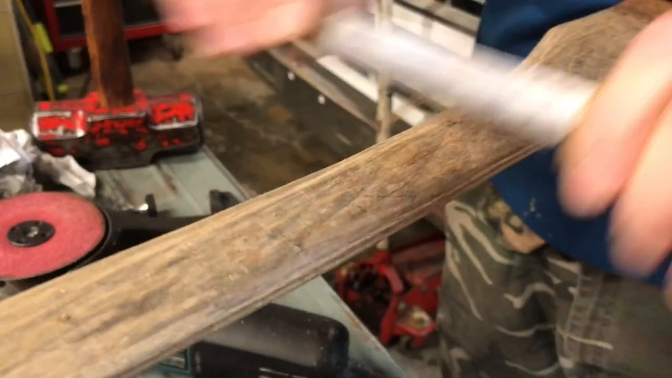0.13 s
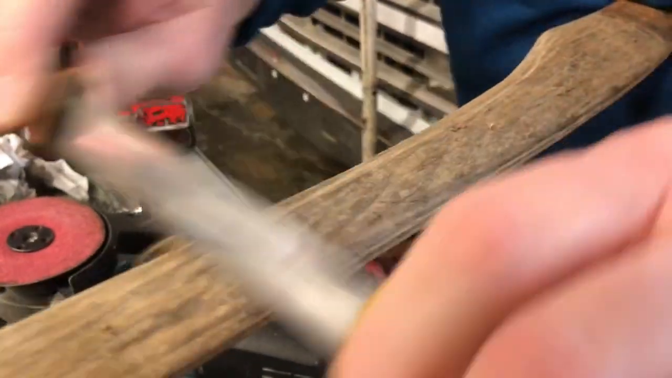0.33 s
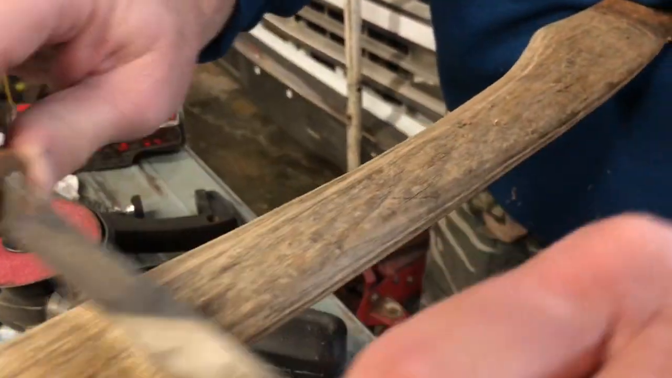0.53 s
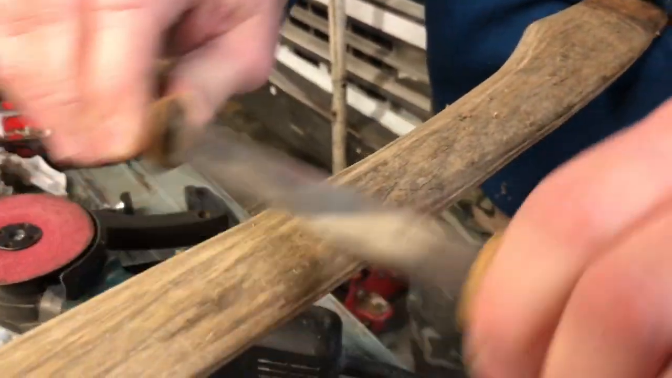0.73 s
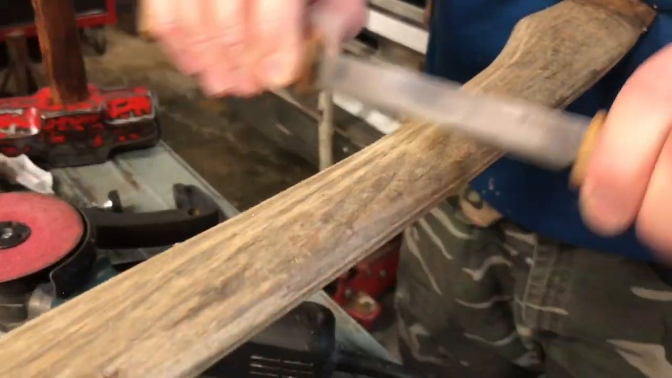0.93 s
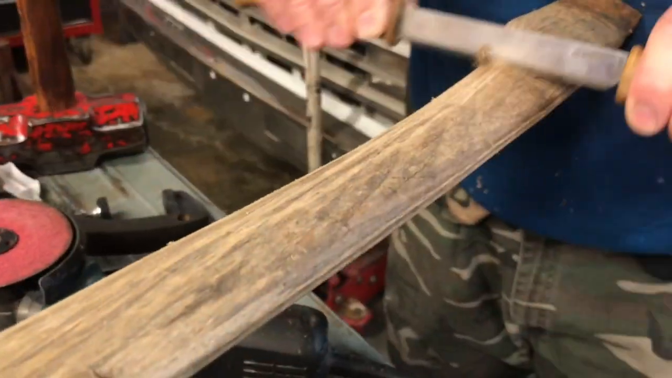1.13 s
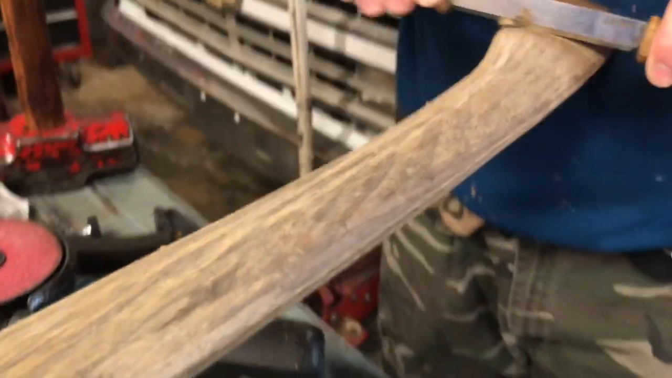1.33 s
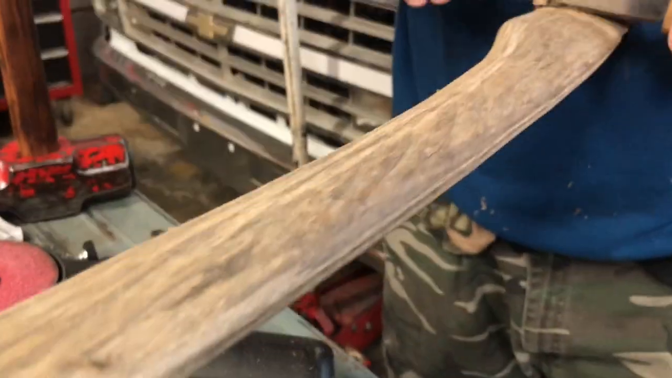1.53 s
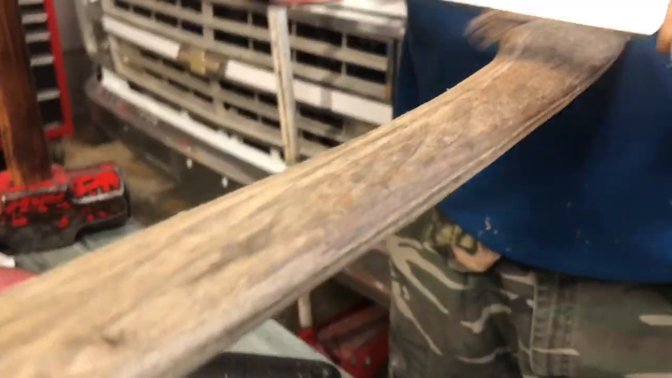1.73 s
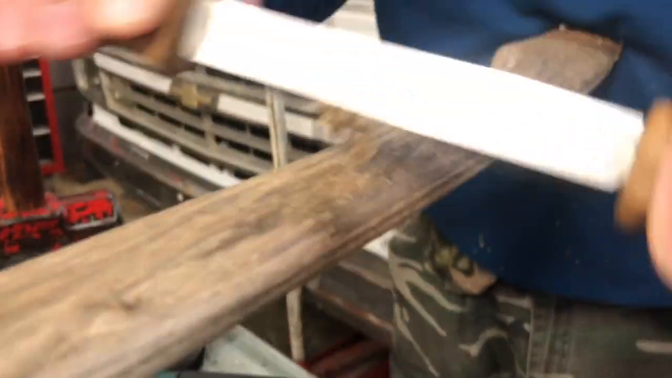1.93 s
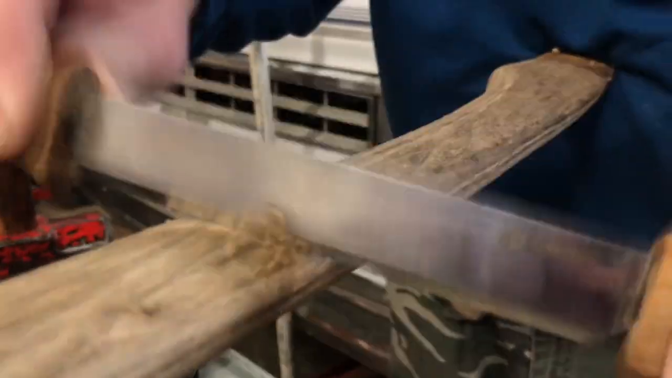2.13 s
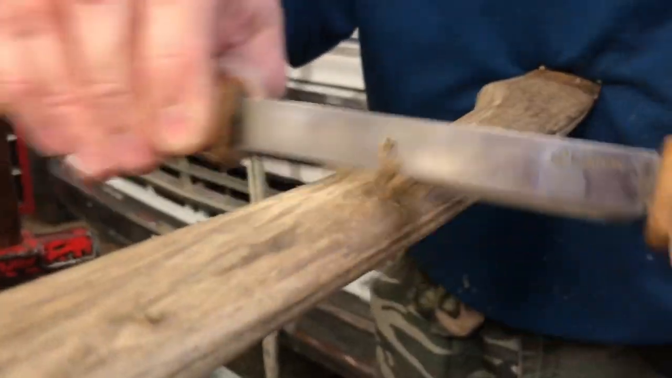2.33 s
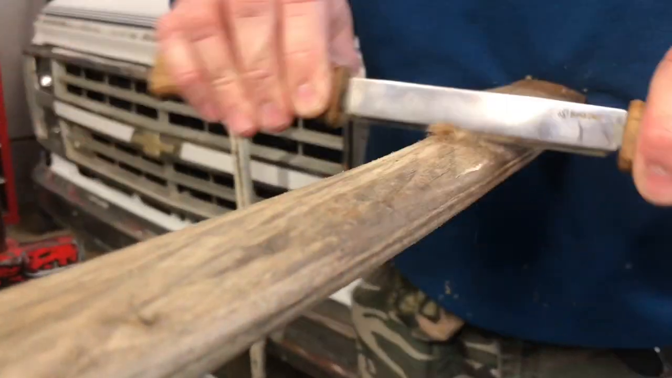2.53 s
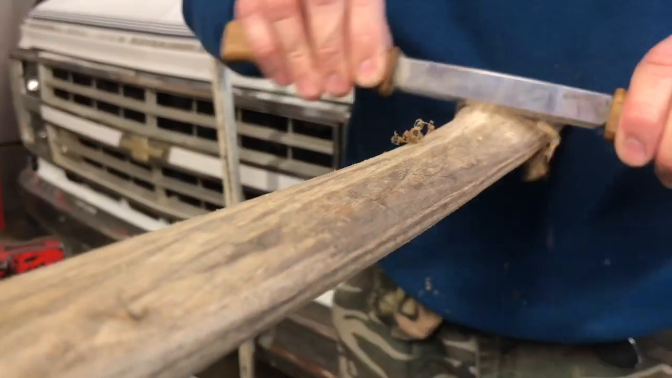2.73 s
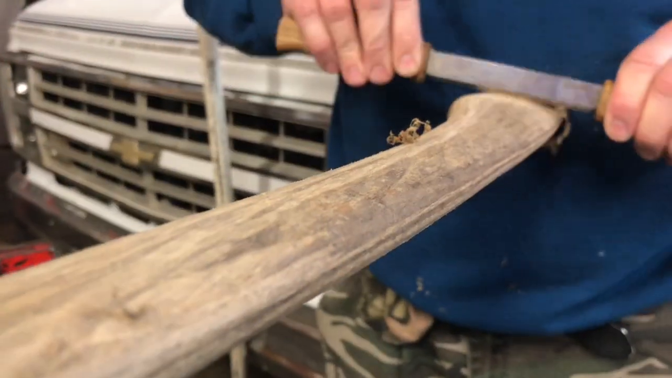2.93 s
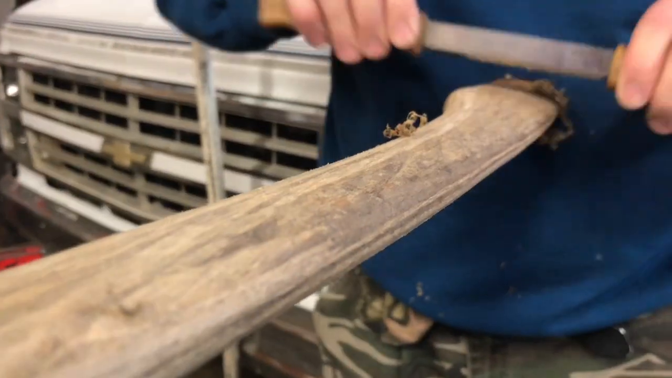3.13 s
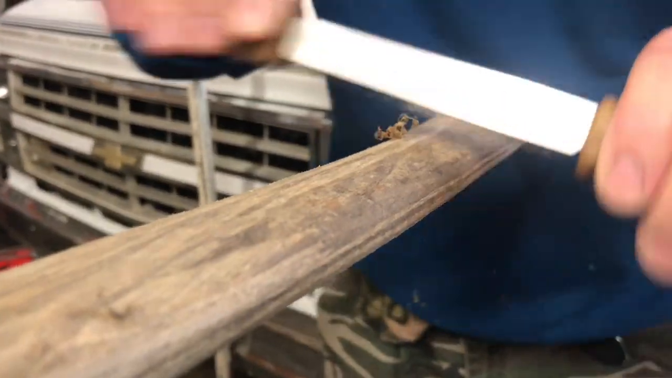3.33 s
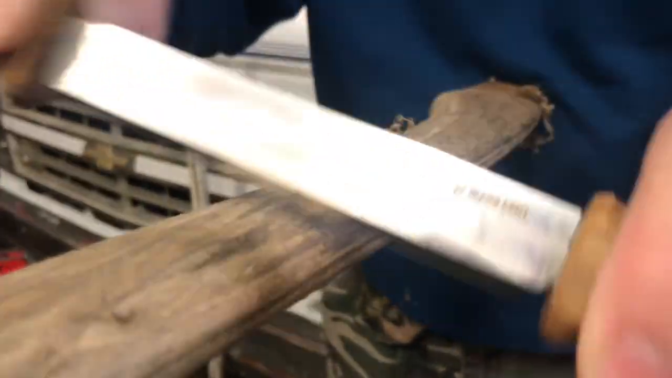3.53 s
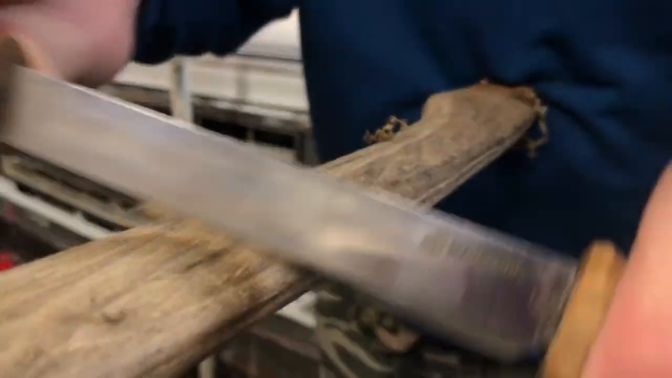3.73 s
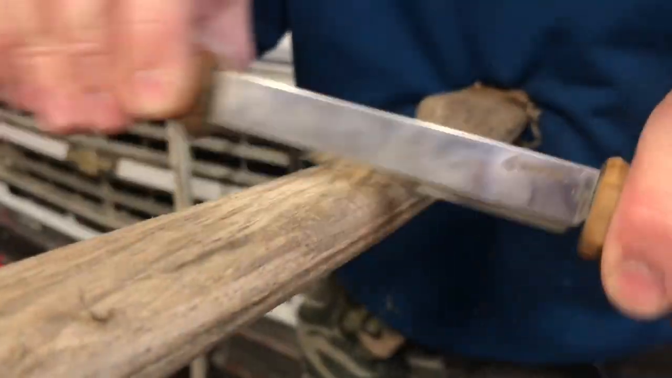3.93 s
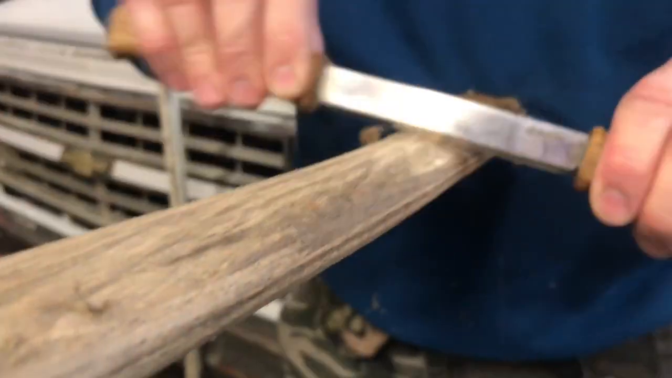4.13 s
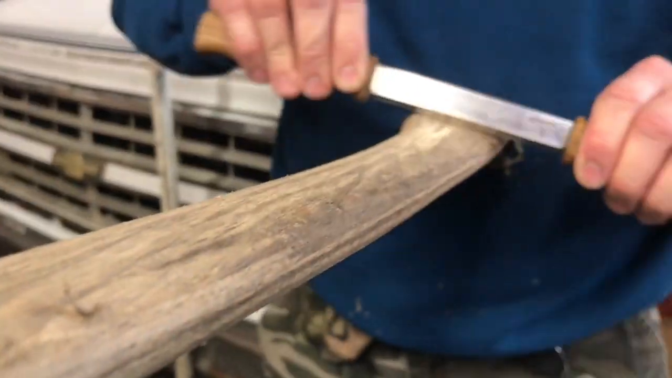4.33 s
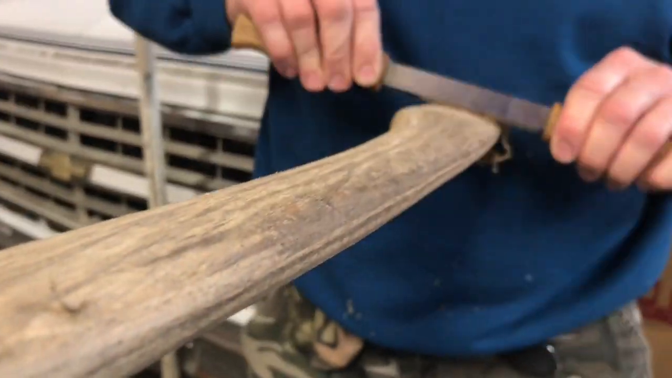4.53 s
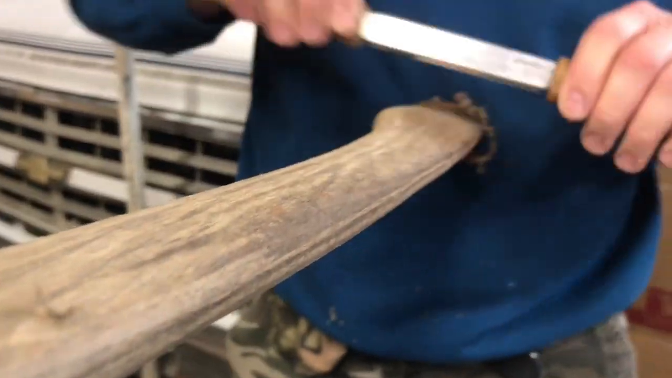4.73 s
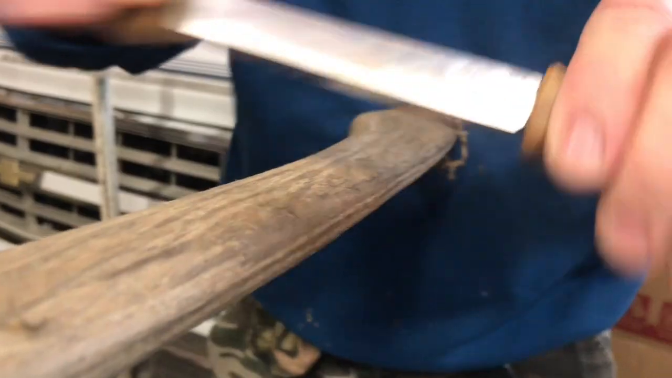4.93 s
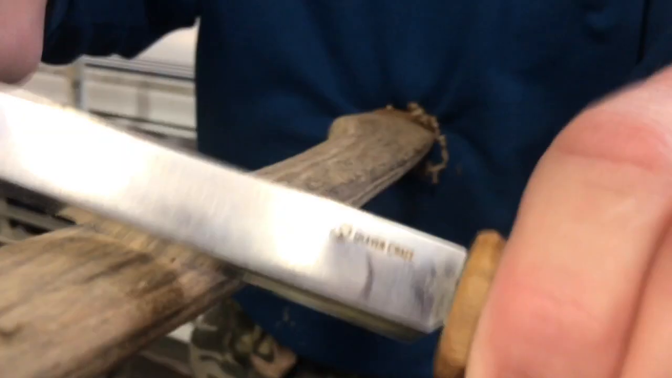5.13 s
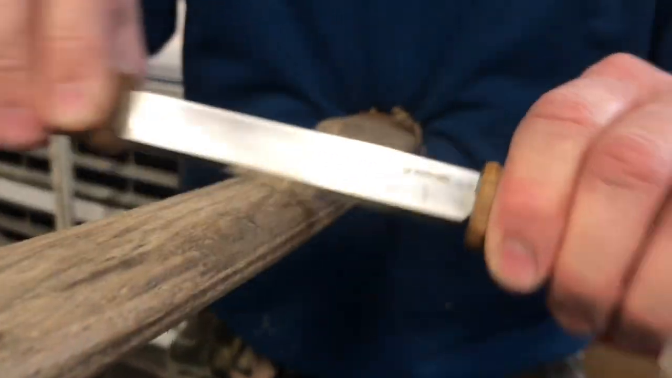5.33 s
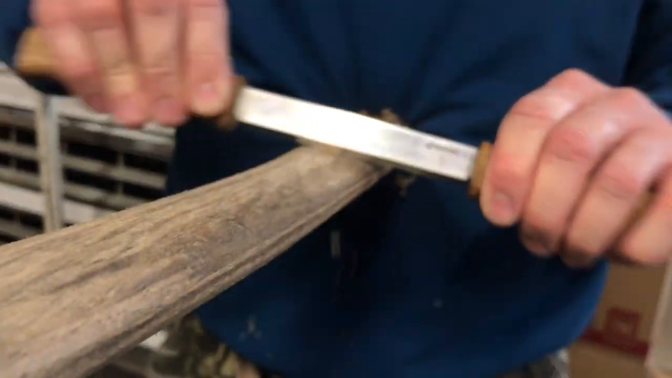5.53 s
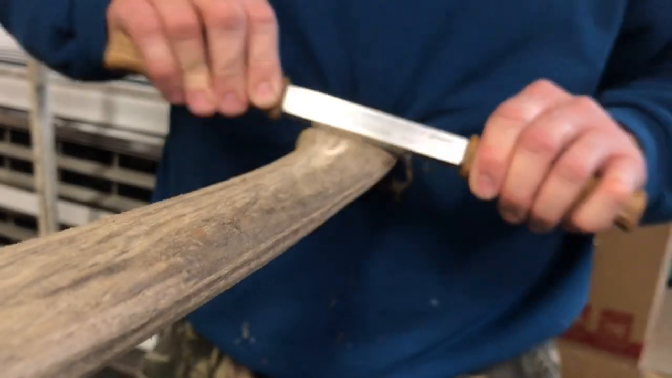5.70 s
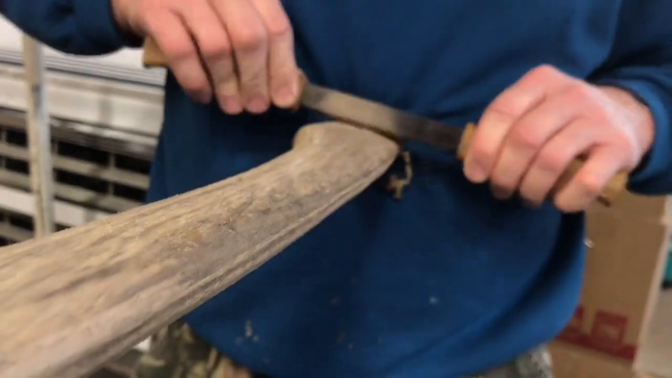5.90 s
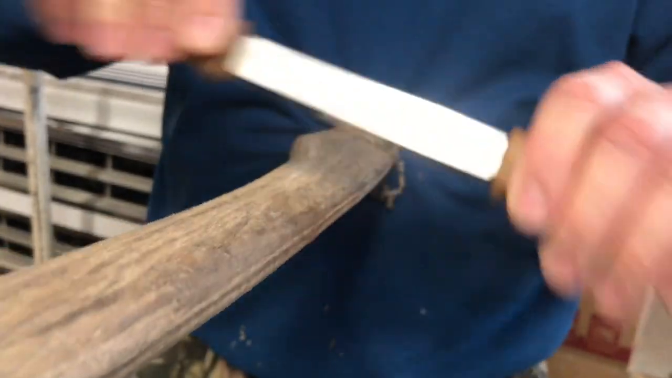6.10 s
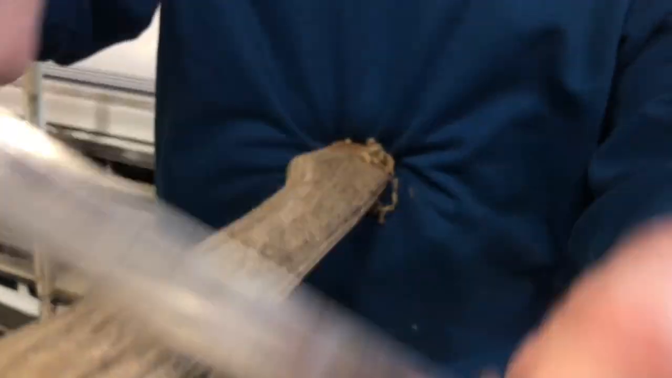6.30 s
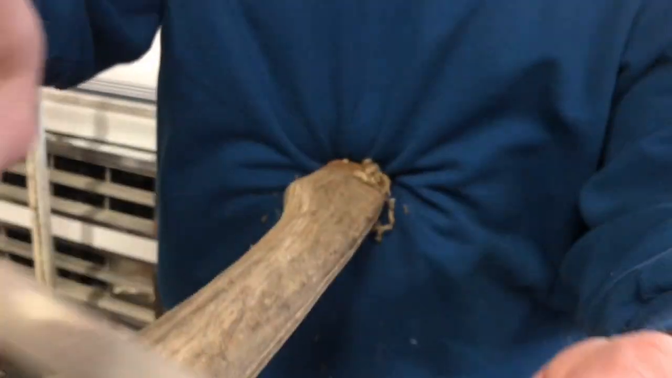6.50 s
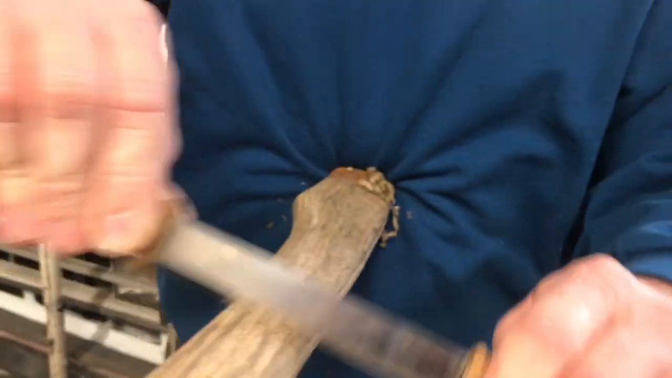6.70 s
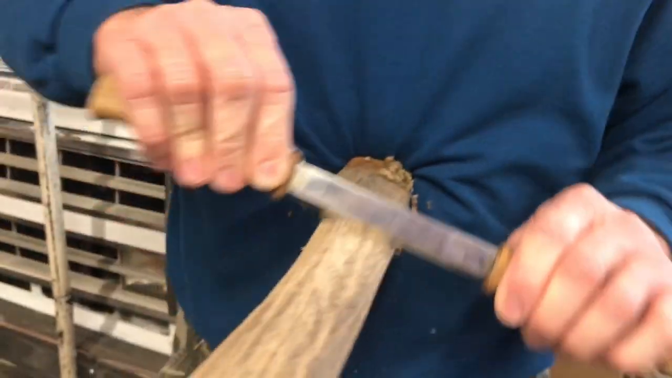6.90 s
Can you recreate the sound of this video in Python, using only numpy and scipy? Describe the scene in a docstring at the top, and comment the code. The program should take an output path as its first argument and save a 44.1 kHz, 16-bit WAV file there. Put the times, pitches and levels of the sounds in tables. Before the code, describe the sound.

In a workshop with a low, quiet hum, a drawknife knocks onto dry wood and scrapes along it for just under a second. This happens five times at a steady pace, with short pauses holding faint ticks and light skims of the blade. Most strokes fade into a small judder, and the last has a sharp splinter snap near its start. The sound is close, with little room echo.

```python
"""A two-handled steel blade pulled along an old wooden handle: five strokes, close to one microphone.
Each stroke lands with a knock, then tears fibres: a dense crackle that rings the wood and the blade.
The first four run off the handle's end with a judder. Between strokes the blade ticks and skims over
the wood, and splinters snap. Behind it all is the workshop: a short room tail and a quiet machine hum."""
import sys
import numpy as np
from scipy import signal
from scipy.fft import rfft, irfft
from scipy.io import wavfile
from scipy.ndimage import uniform_filter1d

SR = 44100
rng = np.random.default_rng(int(sys.argv[2]) if len(sys.argv) > 2 else 0)


def store_pcm(level_fs):
    """Save levels as 16-bit WAV."""
    pcm = np.round(np.clip(level_fs, -1, 1) * 32767).astype(np.int16)
    wavfile.write(sys.argv[1], SR, np.atleast_2d(pcm).T)


N = 306936

# colour of the workshop's room tone: freq_hz, density_db
ROOM_TONE = [(12, -56.5), (27, -31), (44, 2), (130, -2), (200, -6.5), (330, -17), (560, -26), (800, -30.5),
             (1150, -26), (1500, -33.5), (2100, -38.5), (3900, -43), (7000, -50), (16000, -54)]
# drift of the air noise above the rumble: time_s, gain_db
AIR_DRIFT = [(0, 10.5), (.5, 8.5), (1.9, 8), (3.4, 11.5), (3.7, 5.5), (4.95, 6), (6.1, 10), (6.96, -7)]
# a machine in the background: pitch_hz, level_db
MACHINE_HUM = [(64.6, -61.5), (119.5, -55), (457, -82), (1061, -78), (1152, -87), (1453, -77)]
# light touches of the blade and snapping splinters: start_s, level_db, body_db, bright_hz
TICKS = [(0.271, -47, -14, 5000), (.3018, -44.5, -12, 3620), (.3796, -41, -8, 7840),
         (1.9815, -45.5, -14, 7000), (3.263, -33.5, -21, 4970), (4.591, -23, -1, 12000),
         (4.985, -47.5, 6, 1770), (6.123, -43.5, 8, 1500), (6.1726, -27.5, -17, 12330),
         (6.1808, -33, -18, 4000), (6.353, -27.5, 0, 4000), (6.386, -45, -13, 8000),
         (6.5879, -13.5, -15, 2170)]
# colour of a light touch on the wood: freq_hz, density_db
TOUCH_COLOUR = [(200, 1), (900, -16), (1700, 3.5), (2400, -3.5), (3900, -2.5), (5200, -10.5), (7000, -8),
                (10500, -12.5), (12500, -12.5), (16000, -17)]
# decay of the room: freq_hz, t60_s
ROOM_DECAY = [(100, 0.86), (600, 0.73), (2000, 0.14), (4200, 0.54), (9000, 0.2), (16000, 0.06)]
# what the walls give back: freq_hz, gain_db
WALL_COLOUR = [(100, 6.5), (350, 2), (600, -0.5), (1500, 3.5), (4000, -5), (7000, -4), (16000, -8)]
# the blade lands: start_s, force_db, blade_db, hardness_db_per_octave, pitch_ratio
KNOCKS = [(0.5736, 0.5, -3.5, -1.5, 1.027), (2.1946, 1.5, 1.5, 5, 1.012), (3.7211, -1.5, 1, 0, 0.98),
          (5.1883, 0.5, 4, -4, 1.0), (6.4571, -3, -0.5, 0, 0.97)]
# modes of the struck wood: pitch_hz, level_db, t60_s
WOOD_MODES = [(162, -28, 0.073), (264, -30, 0.091), (544, -18.5, 0.048), (700, -8.5, 0.0095),
              (909, -12.5, 0.027), (1137, -16, 0.032), (1345, -2.5, 0.011), (1512, -3, 0.0095),
              (2360, -18, 0.01)]
# modes of the struck blade: pitch_hz, level_db, t60_s
BLADE_MODES = [(3120, -17, 0.011), (3890, -9.5, 0.0098), (4400, -9.5, 0.0037), (6960, -23.5, 0.0063),
               (8520, -30.5, 0.0096), (10900, -26, 0.0023), (12200, -30, 0.0023), (14930, -30, 0.0027)]
# what the bench throws back: freq_hz, gain_db
BENCH_COLOUR = [(100, 1), (500, -2.5), (1000, 7.5), (1500, -1), (2100, 8.5), (4000, -6.5), (16000, -3)]
# the pull after each landing: length_s, run_up_s, release_db_per_s, wood_db, blade_db, fizz_db,
# fade_db, ring_hz, ring_width_hz, upper_ring_ratio, shaving_end_hz, shaving_end_db
STROKES = [(0.95, 0.17, 385, -34, -22.5, -31.5, -10, 3790, 840, 0.53, 2500, 5),
           (.822, 0.097, 328, -33.5, -24, -31.5, -5.5, 4140, 900, 0.87, 2700, 5.5),
           (.879, 0.14, 374, -34.5, -22, -30, -10, 4100, 970, 0.69, 2680, 6),
           (.7, 0.042, 494, -35.5, -24.5, -31.5, -7.5, 4020, 880, 0.65, 1800, 10.5),
           (.8, 0.2, 380, -31, -22, -29.5, -7.5, 4080, 700, 0.56, 2300, 8)]
# bare colour of tearing fibres: freq_hz, density_db
TEAR_COLOUR = [(60, -36.5), (270, -13), (370, -16.5), (490, -18), (700, -13.5), (1300, -12), (1900, -13),
               (3200, -11), (4550, -12), (5300, -15.5), (8000, -14.5), (10500, -20), (14000, -25),
               (16000, -25)]
# resonances of the scraped wood along the handle: pitch_hz, width_hz, start_lift_db, end_lift_db
WOOD_RESONANCES = [(610, 45, 3.5, 15.5), (812, 66, 9, -2), (917, 64, 12, 7), (1136, 100, 2.5, 13),
                   (1370, 120, 1.5, 8), (1566, 110, 5.5, 3.5), (2118, 89, 3.5, 12.5), (2705, 670, 4, 8.5)]
# the blade's gliding upper rings: start_hz, end_hz, width_hz, lift_db, nearest_lift_db
BLADE_RESONANCES = [(5600, 6200, 310, 9.5, -2), (6440, 6750, 650, 10.5, 0.5), (8700, 9320, 1300, 4, 5),
                    (12050, 12400, 1800, 4, 10), (14200, 17000, 2400, -4.5, 8)]
# the edge catches the grain and one ring stands out: centre_s, half_length_s, pitch_hz, width_hz, lift_db
CATCHES = [(0.825, 0.33, 3240, 800, 6), (.87, 0.19, 2150, 200, 8), (1.285, 0.043, 640, 110, 19),
           (1.45, 0.053, 2190, 450, 9.5), (2.366, 0.14, 1650, 364, 4), (2.397, 0.11, 9250, 900, 9),
           (2.91, 0.19, 1120, 450, 6.5), (5.29, 0.066, 1770, 160, 17), (5.832, 0.031, 1700, 170, 15),
           (6.72, 0.13, 864, 230, 10.5), (6.76, 0.097, 7730, 1500, 12.5), (6.813, .07, 11200, 1300, 8),
           (6.935, 0.12, 1610, 151, 14.5)]
# the edge digs deeper (+) or rides over smooth grain (-): centre_s, half_length_s, gain_db
BITES = [(0.7, 0.013, 2), (0.805, 0.1, 2), (1.16, 0.045, -2), (1.432, 0.075, 3.5), (2.5, 0.06, 4),
         (2.63, 0.14, -3), (2.818, 0.06, 2.5), (3.91, .015, 3), (4.323, 0.063, 2.5), (5.35, 0.016, 1),
         (5.872, 0.017, 2), (6.591, 0.016, 2), (6.678, 0.058, 4)]
# how wood, blade and fizz follow a stroke: speed_power, fade_ratio, end_db, bite_ratio, release_ratio
BAND_RESPONSE = [(.6, .15, 2.5, 0.42, 0.77), (1.05, 1, -1, 1, 1.09), (1.05, 0.84, -2, 0.88, 1.1)]
# the edge runs off the handle's end: centre_s, level_db, half_length_s
RUN_OFFS = [(1.521, -32, 0.034), (3.038, -37, 0.049), (4.602, -37, 0.048), (5.9, -33, 0.022)]
# low modes shaken by that judder: pitch_hz, width_hz, level_db
JUDDER_MODES = [(277, 160, 0.5), (442, 18, -1), (625, 86, 12), (890, 140, -3), (1084, 30, 14)]
# the blade skims back: start_s, length_s, level_db, swell_db_per_s, brightness_db_per_octave
SKIMS = [(1.79, .16, -68, 6, 1.5), (3.1, .14, -50.5, -11, -1), (6.163, 0.208, -54, 18, 0.6)]


def amp(db):
    """Decibels to gain."""
    return 10 ** (np.asarray(db) / 20)


def unit(x):
    """Scales to rms 1."""
    return x / np.sqrt(np.mean(x ** 2) + 1e-20)


def read(points, hz):
    """Reads a table on a log-frequency axis."""
    f, value = np.transpose(points)
    return np.interp(np.log(hz + 1), np.log(f + 1), value)


def add(mix, start_s, sound):
    """Mixes a sound in at start_s."""
    part = mix[max(round(start_s * SR), 0):][:len(sound)]
    part += sound[:len(part)]


def colour(x, points):
    """Filters by a table of freq_hz, gain_db."""
    return irfft(rfft(x) * amp(read(points, np.fft.rfftfreq(len(x), 1 / SR))), len(x))


def wander(size, hz):
    """Random motion of rms 1, mostly slower than hz."""
    f = np.fft.rfftfreq(size, 1 / SR)
    return unit(irfft(rfft(rng.standard_normal(size)) * (f > 0) / (1 + (f / hz) ** 2), size))


def hump(hz, centre_hz, width_hz):
    """The shape of a resonance, 1 at its centre."""
    return 1 / (1 + (2 * (hz - centre_hz) / width_hz) ** 2)


def bell(hz, centre_hz, width_hz):
    """A steep-sided peak, 1 at its centre and one half at the edges of its width."""
    return .5 ** ((2 * (hz - centre_hz) / width_hz) ** 2)


def swell(t, centre_s, half_length_s):
    """A smooth rise and fall in time, 1 at centre_s."""
    return np.exp(-((t - centre_s) / half_length_s) ** 2)


def room_tone(noise_db=-49, rumble_hz=500, waver_hz=4):
    """The workshop behind the bench: low rumble, drifting air noise and a machine's wavering hum."""
    noise = amp(noise_db) * unit(colour(rng.standard_normal(N), ROOM_TONE))
    rumble = signal.sosfiltfilt(signal.butter(2, rumble_hz, fs=SR, output="sos"), noise)
    air = (noise - rumble) * amp(np.interp(np.arange(N) / SR, *np.transpose(AIR_DRIFT)))
    hum = np.zeros(N)
    for hz, db in MACHINE_HUM:
        pitch_hz = hz + waver_hz * wander(N, hz=5.05)
        hum += amp(db) * unit(np.sin(2 * np.pi * np.cumsum(pitch_hz) / SR))
    return rumble + air + hum


def ring(modes, pitch_ratio):
    """Dying modes; neighbours start in opposite directions, so the blow takes a moment to build."""
    t = np.arange(SR // 8) / SR
    return sum((-1) ** k * amp(db - 60 * t / t60_s) * np.sin(2 * np.pi * hz * pitch_ratio * t)
               for k, (hz, db, t60_s) in enumerate(modes))


def tick(start_s, level_db, body_db, bright_hz, t60_s=0.01):
    """A light touch or a snapping splinter: a brief crack with some of the wood's ring."""
    t = np.arange(SR // 8) / SR
    tone = [(hz, db + 10 * hump(hz, bright_hz, .5 * bright_hz)) for hz, db in TOUCH_COLOUR]
    crack = unit(colour(rng.standard_normal(len(t)), tone)) * amp(-60 * t / t60_s)
    body = amp(body_db) * ring(WOOD_MODES, pitch_ratio=0.87)
    return start_s, amp(level_db) * (crack + body)


def room_tail(direct, gap_s=.008):
    """The walls return a diffuse tail to the microphone, each band dying at its own speed."""
    taps = rng.standard_normal(SR // 2) * (np.arange(SR // 2) > gap_s * SR)
    hz, t, spectrum = signal.stft(taps, SR, nperseg=256)
    decay = amp(-60 * t / read(ROOM_DECAY, hz)[:, None])
    tail = signal.istft(spectrum * decay, SR, nperseg=256)[1]
    return colour(signal.fftconvolve(direct, tail / np.linalg.norm(tail))[:N], WALL_COLOUR)


def knock(start_s, force_db, blade_db, hardness, pitch_ratio, scatter_db=-14, scatter_t60_s=0.06):
    """The edge hits the wood and both ring; the bench and things nearby scatter the blow."""
    blow = ring(WOOD_MODES, pitch_ratio)
    steel = [(hz, db + blade_db + hardness * np.log2(hz / 4000), t60_s) for hz, db, t60_s in BLADE_MODES]
    add(blow, start_s=.0005, sound=ring(steel, pitch_ratio))
    t = np.arange(len(blow)) / SR
    scatter = rng.standard_normal(len(t)) * amp(-60 * t / scatter_t60_s) * (t > .003)
    bench = colour(scatter / np.linalg.norm(scatter), BENCH_COLOUR)
    echoes = signal.fftconvolve(blow, bench)[:len(t)]
    return start_s, amp(force_db) * (blow + amp(scatter_db) * echoes)


def fibres(size, per_s, spread_db):
    """A train of tiny fractures, many small and a few large."""
    strengths = amp(spread_db * np.minimum(rng.exponential(1, size), 4))
    return unit(strengths * rng.standard_normal(size) * (rng.random(size) < per_s / SR))


def resonances(hz, age_s, ring_hz, ring_width_hz, upper_ring_ratio,
               ring_db=13.5, ring_fade_db=-3, sag_hz=160, ripple_db=1.2):
    """Colour in dB of the scraped wood and the blade, shifting as the edge travels."""
    travel = np.clip(age_s / 0.84, 0, 1)  # share of the handle covered
    glide = np.clip(age_s / 0.29, 0, 1)  # the blade's rings settle as the stroke gets under way
    nearness = swell(age_s, centre_s=0.13, half_length_s=.27)  # the blade passes the microphone
    shape_db = read(TEAR_COLOUR, hz)
    for pitch_hz, width_hz, start_db, end_db in WOOD_RESONANCES:
        shape_db = shape_db + (start_db + (end_db - start_db) * travel) * hump(hz, pitch_hz, width_hz)
    for start_hz, end_hz, width_hz, lift_db, nearest_db in BLADE_RESONANCES:
        peak = bell(hz, start_hz + (end_hz - start_hz) * glide, width_hz)
        shape_db += (upper_ring_ratio * lift_db + nearest_db * nearness) * peak
    main_ring = bell(hz, ring_hz + sag_hz * (1 - glide), ring_width_hz)
    shape_db += (ring_db + ring_fade_db * travel) * main_ring
    # a near reflection lags more as the blade moves away: ripples slide down the spectrum
    lag_s = np.interp(travel, [0, 1], [.0014, .0026])
    return shape_db + ripple_db * np.cos(2 * np.pi * hz * lag_s)


def shaving(hz, age_s, length_s, end_hz, end_db, start_hz=3010, plunge_s=0.015):
    """Lift in dB of the shaving: it rings lower and louder as it grows, and plunges as it tears free."""
    grown = np.clip(age_s / length_s, 0, 1) ** 0.87
    freed = np.exp(np.minimum((age_s - length_s) / plunge_s, 1))
    held_hz = start_hz + (end_hz - start_hz) * grown
    return end_db * grown ** 2 * bell(hz, held_hz * np.exp(-0.76 * freed), width_hz=0.2 * held_hz)


def catches(hz, time_s):
    """Lift in dB of the rings that stand out where the edge catches."""
    return sum(lift_db * swell(time_s, centre_s, half_s) * bell(hz, pitch_hz, width_hz)
               for centre_s, half_s, pitch_hz, width_hz, lift_db in CATCHES)


def grain(shape, bins):
    """Uneven grain favours now one resonance, now another: a smooth random field of rms 1."""
    across_pitch = uniform_filter1d(rng.standard_normal(shape), size=bins, axis=0)
    return unit(uniform_filter1d(across_pitch, size=12, axis=1))


def stroke(landing_s, length_s, run_up_s, release_db_per_s, wood_db, blade_db, fizz_db, fade_db,
           ring_hz, ring_width_hz, upper_ring_ratio, shaving_end_hz, shaving_end_db,
           bounce_s=.008, chatter_db=0.5, grip_db=0.6, fine_grain_db=2.08, broad_grain_db=2.0):
    """The edge bounces, sinks in and gathers speed, gripping and slipping; torn fibres ring the work."""
    t = np.arange(bounce_s, length_s + .2, 1 / SR)
    tearing = fibres(len(t), per_s=14000, spread_db=0.37) * amp(chatter_db * wander(len(t), hz=130))
    hz, frame_s, spectrum = signal.stft(tearing, SR, nperseg=2048, noverlap=1536)
    hz, age_s = hz[:, None], frame_s + bounce_s
    shape_db = resonances(hz, age_s, ring_hz, ring_width_hz, upper_ring_ratio)
    shape_db += shaving(hz, age_s, length_s, shaving_end_hz, shaving_end_db)
    shape_db += catches(hz, landing_s + age_s)
    shape_db += fine_grain_db * grain(spectrum.shape, bins=6)
    shape_db += broad_grain_db * grain(spectrum.shape, bins=36)
    # three bands, each with its own envelope: wood low, blade in the middle, fibre fizz on top
    above_wood, above_blade = (1 / (1 + (split_hz / (hz + 1)) ** 24) for split_hz in (2300, 5200))
    bands = (1 - above_wood, wood_db), (above_wood - above_blade, blade_db), (above_blade, fizz_db)
    speed = 1 - np.exp((bounce_s - t) / run_up_s)
    travel = np.minimum(t / length_s, 1)
    release_db = release_db_per_s * np.maximum(t - length_s, 0)
    bite_db = sum(db * swell(landing_s + t, centre_s, half_s) for centre_s, half_s, db in BITES)
    scrape = np.zeros(len(t))
    for (band, level_db), response in zip(bands, BAND_RESPONSE):
        speed_power, fade_ratio, end_db, bite_ratio, release_ratio = response
        gain = band * amp(shape_db)
        gain /= np.linalg.norm(gain, axis=0)  # the colour moves while the power holds
        crackle = signal.istft(spectrum * gain, SR, nperseg=2048, noverlap=1536)[1][:len(t)]
        envelope_db = level_db + (fade_ratio * fade_db + end_db) * travel
        envelope_db += bite_ratio * bite_db - release_ratio * release_db
        scrape += unit(crackle) * speed ** speed_power * amp(envelope_db)
    return landing_s + bounce_s, scrape * amp(grip_db * wander(len(t), hz=24))


def run_off(centre_s, level_db, half_length_s):
    """At the handle's end a swell of coarse slips shakes its low modes."""
    t = np.arange(-SR // 8, SR // 8) / SR
    hz = np.fft.rfftfreq(len(t), 1 / SR)
    body = sum(amp(db) * hump(hz, pitch_hz, width_hz) for pitch_hz, width_hz, db in JUDDER_MODES)
    slips = fibres(len(t), per_s=1900, spread_db=6.0)
    judder = unit(irfft(rfft(slips) * body, len(t)))
    return centre_s + t[0], amp(level_db) * judder * swell(t, 0, half_length_s)


def skim(start_s, length_s, level_db, swell_db_per_s, brightness, fade_s=.012):
    """Barely pressed on its way back, the edge catches only loose fibres."""
    t = np.arange(0, length_s, 1 / SR)
    touch = np.minimum(np.minimum(t, length_s - t) / fade_s, 1)
    tone = [(hz, db + brightness * np.log2(hz / 4000)) for hz, db in TOUCH_COLOUR]
    loose = fibres(len(t), per_s=9000, spread_db=1)
    return start_s, unit(colour(loose, tone)) * touch * amp(level_db + swell_db_per_s * t)


def scene(tail_db=-20.0):
    """The work at the bench, close up and in mono, with the workshop well behind it."""
    work = np.zeros(N)
    for (landing_s, *_), pull in zip(KNOCKS, STROKES):
        add(work, *stroke(landing_s, *pull))
    for source, table in (knock, KNOCKS), (run_off, RUN_OFFS), (tick, TICKS), (skim, SKIMS):
        for row in table:
            add(work, *source(*row))
    return (work + amp(tail_db) * room_tail(work) + room_tone())[None]


def record(dry):
    """The microphone feed, limited to full scale and cut off above 16.1 kHz."""
    low_pass = signal.firwin(511, 16100, window=("kaiser", 9), fs=SR)
    return signal.oaconvolve(np.clip(dry, -1, 1), low_pass[None], "same")


dry = scene()
out = record(dry)
store_pcm(out)
```